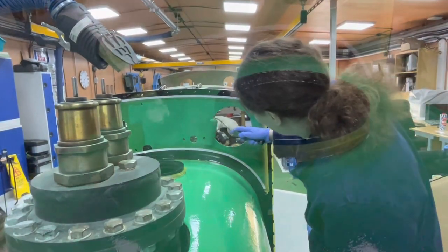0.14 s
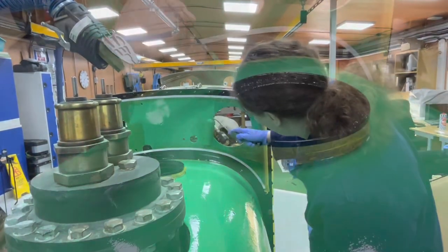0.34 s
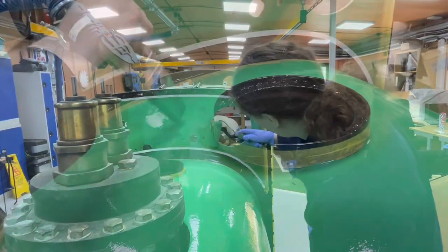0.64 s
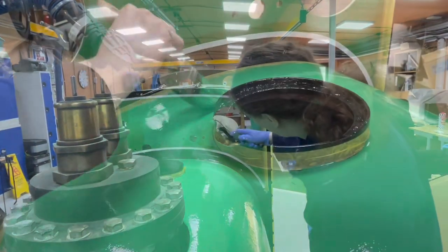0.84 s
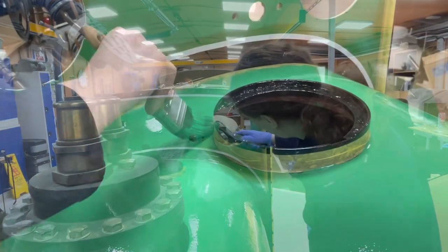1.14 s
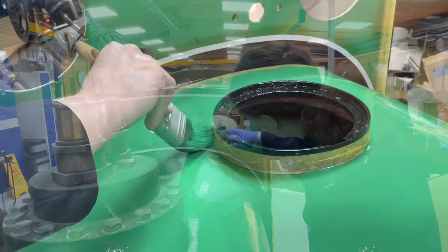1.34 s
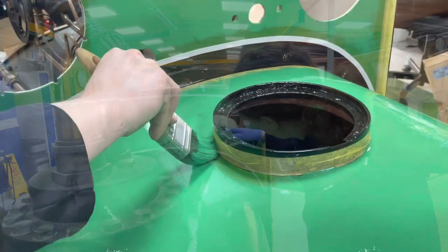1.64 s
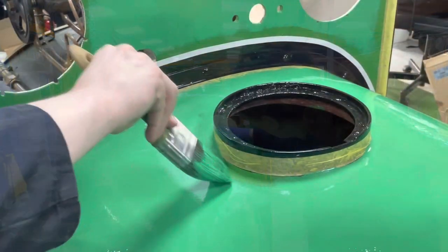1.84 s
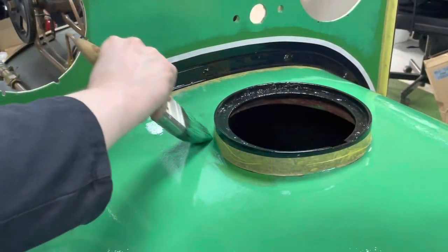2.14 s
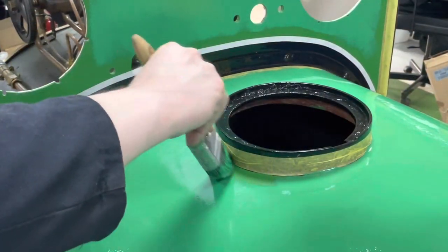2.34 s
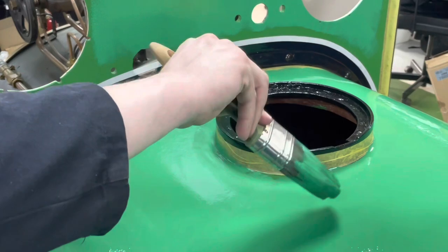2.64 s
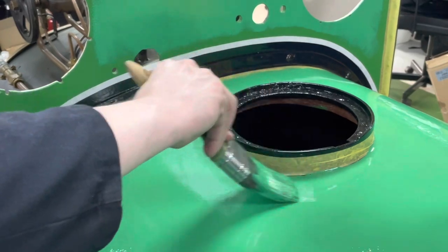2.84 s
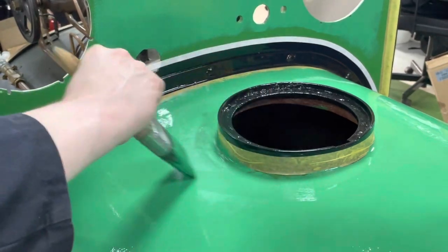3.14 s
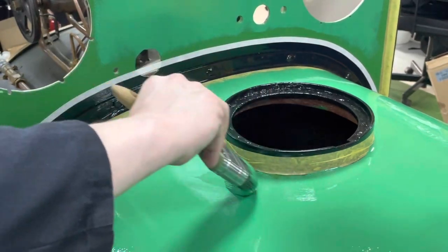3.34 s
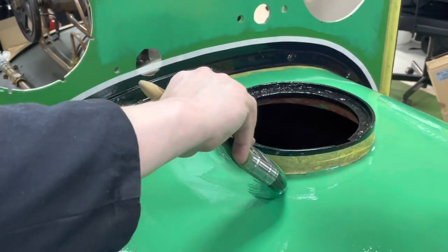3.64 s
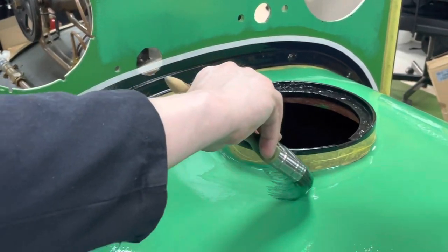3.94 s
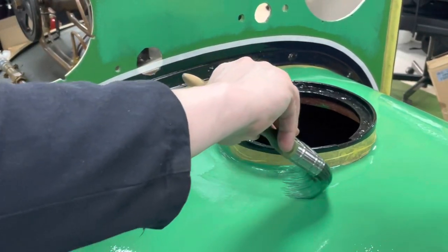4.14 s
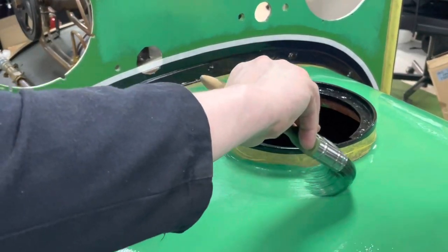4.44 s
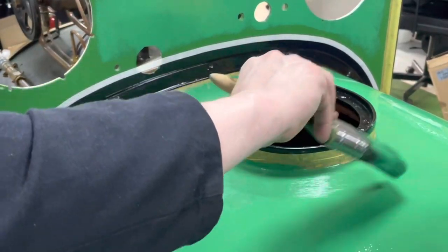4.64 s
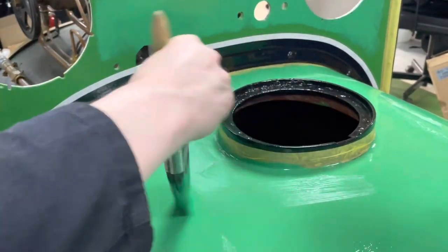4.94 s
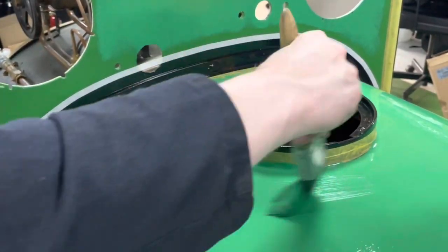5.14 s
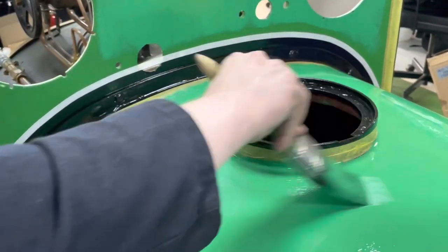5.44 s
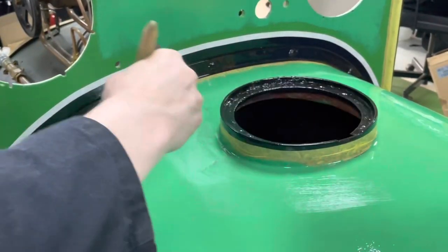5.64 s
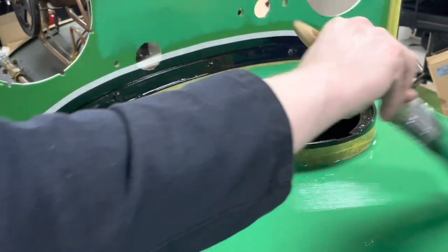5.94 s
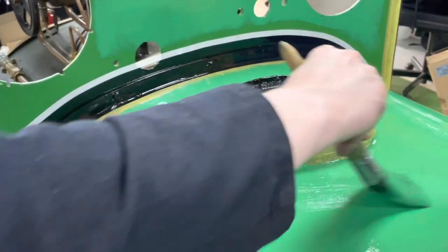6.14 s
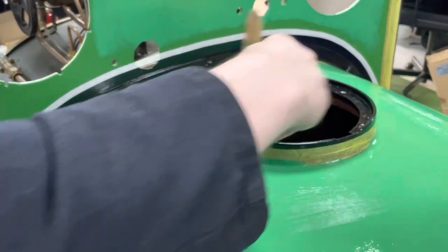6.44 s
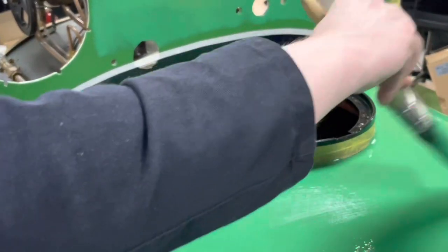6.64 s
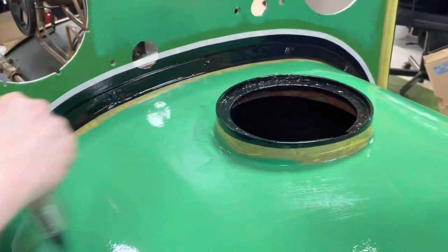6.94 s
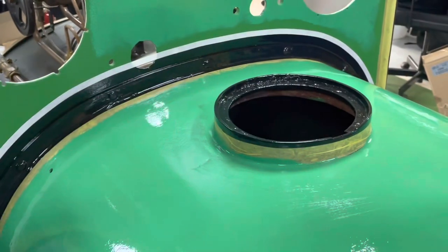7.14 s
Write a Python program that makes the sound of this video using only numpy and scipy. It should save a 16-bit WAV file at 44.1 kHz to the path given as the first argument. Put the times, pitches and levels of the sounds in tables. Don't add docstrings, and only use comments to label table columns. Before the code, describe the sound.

From 0 s, a distant ventilation fan fills a large workshop with diffuse rushing air, hollow midrange duct ringing and a faint low drone around 110 Hz, swelling gently, strongest near 0.8-1 s. Between 0 and 2 s this wide wash smoothly cross-fades into a closer stereo spot: denser, bassier air, with a coloured reflection off a nearby steel shell. Thin, rough high whistles puff softly around 1.8 and 2.3 s, and disappear by about 3.5 s; a lower breathy whistle is faintly present, clearest near 1.4 and 2.9 s. From 2 s to the end at about 7.3 s, the rush stays steady while the low drone throbs irregularly, with strong swells near 3, 4.2 and 4.9 s, above a deep, steady shaft hum. A second, slightly higher boom swells near 4.6 s. Treble is dull and slightly grainy, and loudness creeps upward. No brushing or voices are heard.

```python
import sys
import numpy as np
from scipy import signal
from scipy.fft import rfft, irfft, next_fast_len
from scipy.io import wavfile
from scipy.ndimage import map_coordinates

SR = 44100
rng = np.random.default_rng(int(sys.argv[2]) if len(sys.argv) > 2 else 0)


def int16_out(signal):
    q = np.round(np.clip(np.atleast_2d(signal).T, -1, 1) * 32767)
    wavfile.write(sys.argv[1], SR, q.astype(np.int16))


def decibels_to_gain(level_db):
    exponent = np.asarray(level_db, float) / 20
    return 10 ** exponent


N = 321928

# pitch_hz, level_db_per_hz
HALL_AIR = [(30, -73.7), (70, -66), (135, -60), (190, -57), (230, -62.5), (380, -62), (700, -65),
            (1100, -60), (1500, -63), (1900, -71), (3500, -73.5), (6000, -80.5), (10000, -88),
            (15000, -101.9)]
NEAR_AIR = [(30, -74), (70, -54.5), (135, -51.5), (190, -54.5), (225, -56.5), (400, -61), (1000, -61.5),
            (1500, -62), (1750, -71.5), (2100, -69), (4000, -71), (6000, -77), (9500, -83.5), (15000, -97)]
# centre_hz, width_hz, above_air_db
HALL_DUCT = [(50, 20, -7), (110, 16, 1), (133, 12, 1), (167, 18, -1.5), (261.6, 27, 10), (296, 15, 4.5),
             (453, 30, 7.5), (495, 12, 6), (590, 11, 4.5), (678, 15, 8), (810, 14, 6), (928, 18, 6.5),
             (1067, 49, 6), (1244, 17, -5), (1310, 110, -12), (1413, 29, 8.5), (2420, 45, 7.5),
             (2980, 53, 2), (3750, 160, 7), (5060, 90, 3), (12600, 2500, 0), (90, 10, -9), (362, 50, -11)]
NEAR_DUCT = [(47, 14, -8), (59.3, 11, -9), (70.4, 7.7, 2.5), (90, 8, -1.5), (110, 13, 1), (147, 10, -3),
             (132.4, 14, -14), (170, 12.3, 3.5), (201, 11, 3.5), (224, 22, -14), (249.4, 16, 2.5),
             (267.9, 11.2, 9), (287, 11.5, 4.5), (311.4, 12, 8.5), (352.6, 12.6, 7), (453.6, 11.4, 8),
             (482.3, 25, 9.5), (548, 24, 5.5), (639, 19, 5), (753.5, 30, 5), (818, 44, 4), (1002, 38, 3.5),
             (1089, 26, 6.5), (1211, 250, -3.5), (1484, 65, 2), (1918, 85, 4.5), (2220, 61, 4.5),
             (3037, 176, 5), (3530, 128, 3.5), (4100, 220, 3), (4590, 450, -3.5), (5085, 120, 3.5),
             (5890, 70, 6), (6670, 180, 2.5)]
# pitch_hz, likeness_0_to_1, left_lead_rad, left_minus_right_db
HALL_PORTS = [(60, 0.9, 1.5, -4), (262, 0.94, -0.5, -3.5), (503, 0.53, 1.36, 1), (1090, 0.23, 1.34, 3),
              (1950, .3, 3.5, -3.5), (3020, 0.5, 3.5, 3), (3770, 0.5, 5.5, 1), (5300, .3, 8, 2.5),
              (6500, .45, 7, -2), (8350, .3, 3, -0.5), (9700, 0.4, 2, -6),
              (10250, .7, .9, -1), (10450, .92, .25, 0), (13000, .92, -.3, 0), (13200, .9, -1.7, 0),
                     (13750, .9, -2.2, 0), (13900, .92, -3, 0)]
NEAR_PORTS = [(60, 0.95, 0.23, -1.5), (302, 1, 0.15, 0), (500, 0.88, -0.4, -0.68), (744, 0.68, 0.27, -0.2),
              (1170, 0.63, 0.17, 0.5), (1436, 1, 0.39, 1.5), (1720, .45, 1, -3), (2000, .8, 0.58, 2),
              (2617, 0.97, -0.6, 0.3),
              (3200, .94, 0, 0), (6150, .95, -.2, 0), (6350, .9, -.85, 0), (7500, .92, -2.1, 0),
                     (7700, .93, -2.5, 0), (8350, .94, -3.14, 0), (9000, .93, -3.9, 0),
                     (10300, .92, -5.4, 0), (10450, .94, -5.8, 0), (12350, .94, -6.75, 0),
                     (13100, .92, -7.3, 0), (13750, .92, -8.4, 0), (13900, .94, -9, 0),
                     (15000, .94, -9.5, 0)]
# time_s, level_db
SHELL_ECHO = [(0, -1.5), (2.1, -2.5), (3.8, 0), (6.3, 3), (7.3, 0)]
# crest_s, rise_s, fall_s,
# level_db
DRONE_SURGES = [
    (.12, 0.079, .14, -29.5),
    (.44, 0.15, 0.046, -31),
    (.61, 0.041, .05, -30),
    (.8, 0.041, .15, -26.5),
    (.96, .14, 0.066, -25.5),
    (1.2, 0.15, .12, -32),
    (1.4, .1, 0.09, -33.5),
                (1.6, 0.11, .12, -28), (1.91, 0.21, 0.079, -21.5), (2.23, 0.12, 0.16, -20.5),
               (2.49, .04, .05, -31), (2.67, 0.049, 0.054, -22.5), (2.98, 0.25, 0.11, -18),
               (3.13, .03, 0.029, -24), (3.25, .06, 0.052, -22.5), (3.52, 0.17, 0.098, -26.5),
               (3.665, 0.027, .04, -21.5), (3.75, .025, 0.1, -26), (3.94, 0.044, 0.08, -24),
               (4.17, 0.12, .055, -19), (4.43, .19, 0.054, -25), (4.52, 0.028, 0.14, -27.5),
               (4.86, 0.083, 0.086, -18.5), (5.05, 0.039, 0.17, -24), (5.22, 0.05, .03, -21.5),
               (5.35, 0.08, .04, -25.5), (5.45, .05, .11, -22.5), (5.6, .09, .07, -21.5),
               (5.72, 0.023, .19, -24.5), (6.0, 0.26, .065, -21.5), (6.22, 0.048, 0.053, -19.5),
               (6.42, 0.098, .26, -20), (6.75, .1, 0.041, -27.5), (6.95, .05, 0.042, -25),
               (7.18, 0.081, .07, -25.5)]
# time_s, pitch_hz
DRONE_PITCH = [(0, 109), (.43, 112.9), (.6, 107.7), (.8, 110.4), (.98, 108.7), (1.4, 112.5), (2.3, 110.2),
               (2.58, 114.4), (2.7, 110.2), (4.48, 110), (4.65, 112.8), (5.0, 110), (5.6, 109.5),
               (5.7, 113.5), (5.85, 110), (6.2, 108), (6.5, 109.9), (7.2, 113.4)]
# crest_s, level_db
BOOM_SURGES = [
    (1.92, -34),
    (2.32, -38),
    (3.25, -32.5),
    (3.7, -34),
    (4.62, -28),
    (5.22, -32),
    (5.5, -38),
    (6.22, -31.5),
    (7.08, -31.5),
]
# time_s, level_db
SHAFT_LEVEL = [(0, -45), (1.1, -53), (1.6, -57), (1.83, -43), (3.35, -46), (3.5, -42), (7.3, -42.5)]
# crest_s, level_db
PUFFS = [
    (.89, -55),
    (1.32, -57),
    (1.76, -48),
    (1.95, -52),
    (2.11, -56),
    (2.28, -48.5),
    (2.54, -52),
    (2.9, -53),
]
# time_s, pitch_hz
WHISTLE_PITCH = [(0, 6600), (.5, 6470), (.9, 6390), (1.3, 6450), (1.76, 6350), (1.97, 6500), (2.3, 6450),
                 (2.5, 6490), (2.65, 6390), (3.4, 6600)]
# time_s, level_db
LOW_WHISTLE_LEVEL = [(0, -66), (1.0, -62), (1.35, -53), (2.0, -58), (2.9, -51), (3.4, -64), (7.3, -62)]
# time_s, level_db
GAIN_CREEP = [(0, -2.1), (2.6, -1.4), (3.6, -0.4), (6.9, 0.1), (7.3, 1.2)]
# line_number, in lines of SR / 2048 Hz
BAND_EDGES = [48, 56, 64, 72, 80, 88, 96, 108, 120, 132, 144, 160, 176, 196, 216, 240, 264, 292, 320, 352, 366, 384, 400, *range(416, 768, 32)]
# pitch_hz, level_db
FAINT_LINE_DEPTH = [(1000, -26.5), (2000, -22), (6000, -16.5), (8000, -9), (11000, -21), (15000, -7.5)]


def in_time(rows):
    s, *columns = np.transpose(rows)
    return [np.interp(np.arange(N) / SR, s, c) for c in columns]


def over(points, hz, scale):
    at, *columns = np.transpose(points)
    return [np.interp(scale(hz), scale(at), c) for c in columns]


def drift(rate):
    hop, settle = 40, 2000
    r = np.exp(-2 * np.pi * rate * hop / SR)
    noise = rng.standard_normal(N // hop + settle + 2)
    slow = signal.lfilter([1], [1, -2 * r, r * r], noise)[settle:]
    return np.interp(np.arange(N) / hop, np.arange(len(slow)), slow / slow.std())


def tone(hz, level_db, wobble_hz, wobble_db, rate):
    phase = 2 * np.pi * np.cumsum(hz + wobble_hz * drift(rate)) / SR
    return np.sqrt(2) * decibels_to_gain(level_db + wobble_db * drift(rate)) * np.sin(phase)


def surging(idle_gain, rows):
    s = np.arange(0, N / SR + .01, .005)
    crest, rise, fall, db = np.transpose(rows)[:, :, None]
    away = np.where(s < crest, (crest - s) / rise, (s - crest) / fall)
    drop_db = 10.5 * np.minimum(away, 20) ** 1.53
    power = np.sum(decibels_to_gain(2 * (db - drop_db)), axis=0)
    return 10 * np.log10(idle_gain ** 2 + np.interp(np.arange(N) / SR, s, power))


def at_ports(left_db, right_db):
    return decibels_to_gain(np.array([[left_db], [right_db]]))


def rushing_air(spectrum, duct, ports):
    size = next_fast_len(N)
    hz = np.maximum(np.arange(size // 2 + 1) * SR / size, 1.)
    power = decibels_to_gain(2 * over(spectrum, hz, np.log)[0])
    for centre_hz, width_hz, db in duct:
        resonance = 1 / (1 + (2 * (hz - centre_hz) / width_hz) ** 2) ** 2
        power = power * (1 + (decibels_to_gain(2 * db) - 1) * resonance)
    alike, lead, balance_db = over(ports, hz, np.sqrt)
    alike = np.clip(alike, 0, 1)
    side = np.array([[.5], [-.5]])
    shared, *own = rfft(rng.standard_normal((3, size)))
    direct = np.sqrt(alike) * shared * np.exp(1j * lead * side)
    diffuse = np.sqrt(1 - alike) * np.array(own)
    colour = np.sqrt(power * SR / 2) * decibels_to_gain(balance_db * side)
    return irfft((direct + diffuse) * colour, size)[:, :N]


def shifting_reflections(x, narrow_db, broad_db):
    hz, s, lines = signal.stft(x, SR, nperseg=1024)
    row, time = np.meshgrid(np.arange(len(hz)), s, indexing="ij")
    coarse = rng.standard_normal((2, 200, 60))
    narrow = map_coordinates(coarse[0], [row / 3, time * 2.5], order=1)
    narrow = narrow * np.clip(hz / 1500, 0, 1)[:, None]
    broad = map_coordinates(coarse[1], [np.log2(row + 1) * 1.5, time * 5], order=1)
    shell_band = 1 / (1 + (2 * (hz - 1500) / 250) ** 4)
    shell_db = np.outer(shell_band, np.interp(s, *np.transpose(SHELL_ECHO)))
    gain = decibels_to_gain(narrow_db * narrow + broad_db * broad + shell_db)
    return signal.istft(lines * gain, SR, nperseg=1024)[1][:, :N]


def duct_drone():
    level_db = surging(decibels_to_gain(-46), DRONE_SURGES)
    drone = tone(*in_time(DRONE_PITCH), level_db, wobble_hz=0.81, wobble_db=0.1, rate=7.2)
    return drone * at_ports(.7, -.9)


def duct_boom(hall, near):
    idle_gain = np.hypot(hall * decibels_to_gain(-42), near * decibels_to_gain(-36.5))
    rise_s, fall_s = .12, 0.071
    level_db = surging(idle_gain, [(s, rise_s, fall_s, db) for s, db in BOOM_SURGES])
    return tone(151.1, level_db, wobble_hz=1.32, wobble_db=2.0, rate=7.3) * at_ports(-.8, -1.2)


def shaft_hum():
    return tone(48.9, *in_time(SHAFT_LEVEL), wobble_hz=0.13, wobble_db=-0.8, rate=5) * np.ones((2, 1))


def whistle():
    rise_s, fall_s = .17, .12
    level_db = surging(decibels_to_gain(-60), [(s, rise_s, fall_s, db) for s, db in PUFFS]) - 2.5
    fade, = in_time([(3.2, 1), (3.6, 0)])
    leak = tone(*in_time(WHISTLE_PITCH), level_db, wobble_hz=25.1, wobble_db=2.5, rate=30.3)
    return fade * leak * at_ports(-.6, .6)


def low_whistle():
    return tone(5050, *in_time(LOW_WHISTLE_LEVEL), wobble_hz=35, wobble_db=3, rate=25)


def cross_fade():
    hall_out_s, near_in_s = 1.84, 2.01
    s = np.arange(N) / SR
    hall = np.clip(1 - s / hall_out_s, 0, 1)
    near = np.clip(s / near_in_s, 0, 1) * decibels_to_gain(in_time(GAIN_CREEP)[0])
    return hall, near


def scene():
    hall, near = cross_fade()
    hall_air = rushing_air(HALL_AIR, HALL_DUCT, HALL_PORTS)
    near_air = rushing_air(NEAR_AIR, NEAR_DUCT, NEAR_PORTS)
    rush = hall * decibels_to_gain(0.9) * hall_air + near * decibels_to_gain(-0.47) * near_air
    air = shifting_reflections(rush, narrow_db=1.48, broad_db=0.88)
    tones = duct_drone() + duct_boom(hall, near) + shaft_hum()
    return air + tones + whistle() + low_whistle()


def thin_weak_bands(x):
    half, lead_in = 1024, 1374
    k = np.arange(2 * half) + .5
    window = np.sin(np.pi * k / half / 2)
    basis = window * np.cos(np.pi / half * np.outer(k[:half], k + half / 2)) * np.sqrt(2 / half)
    count = (N + lead_in) // half + 1
    tail = (count + 1) * half - N - lead_in
    pair = np.array([x[0] + x[1], x[0] - x[1]]) / 2
    pair = np.pad(pair, ((0, 0), (lead_in, tail)), mode="reflect")
    blocks = pair.reshape(2, -1, half)
    lines = np.concatenate([blocks[:, :-1], blocks[:, 1:]], axis=2) @ basis.T
    for low, high in zip(BAND_EDGES, BAND_EDGES[1:]):
        hz = low * SR / half / 2
        band = lines[:, :, low:high]
        mid, side = np.sqrt(np.mean(band ** 2, axis=2))
        whim_db = 1.0 * rng.standard_normal(len(mid))
        keep_mid = (mid > side * decibels_to_gain(-7 + whim_db)) | (hz < 7000)
        keep_side = side > mid * decibels_to_gain(-8 + whim_db)
        kept = np.array([keep_mid, keep_side]) | (hz < 2050)
        threshold = np.maximum(mid, side) * decibels_to_gain(over(FAINT_LINE_DEPTH, hz, np.log)[0])
        step = 2 * np.maximum(threshold, decibels_to_gain(-56))[:, None]
        lines[:, :, low:high] = kept[:, :, None] * np.round(band / step) * step
    frames = lines @ basis
    joined = (frames[:, 1:, :half] + frames[:, :-1, half:]).reshape(2, -1)
    mid, side = joined[:, lead_in - half:lead_in - half + N]
    return np.array([mid + side, mid - side])


def band_limit(x):
    return signal.sosfilt(signal.butter(12, 15845, fs=SR, output="sos"), x)


def record(dry):
    rumble_filter = signal.butter(4, 35, "high", fs=SR, output="sos")
    mix = thin_weak_bands(signal.sosfilt(rumble_filter, dry))
    return band_limit(mix)


dry = scene()
out = record(dry)
int16_out(out)
```